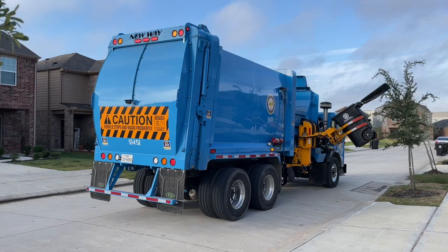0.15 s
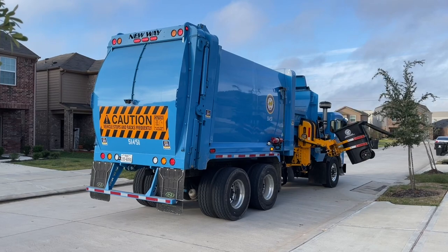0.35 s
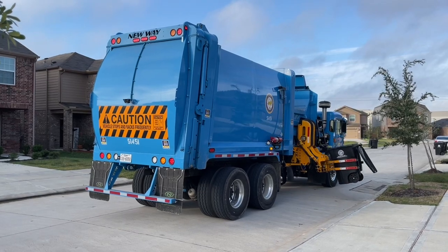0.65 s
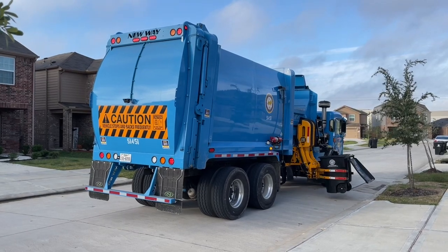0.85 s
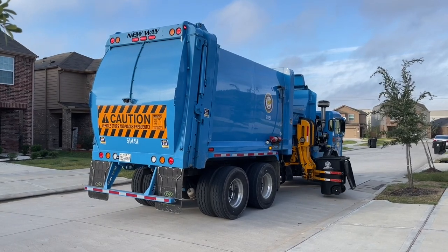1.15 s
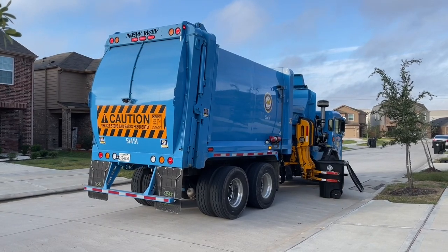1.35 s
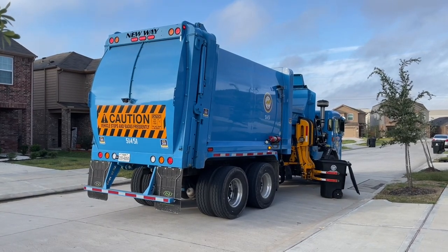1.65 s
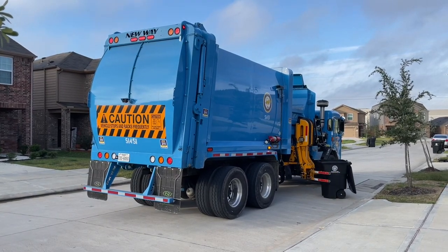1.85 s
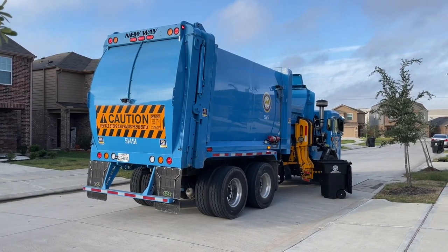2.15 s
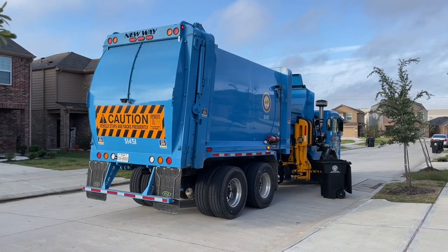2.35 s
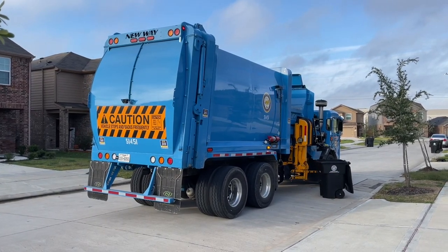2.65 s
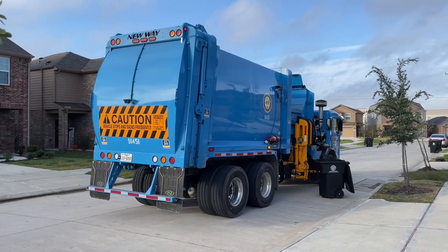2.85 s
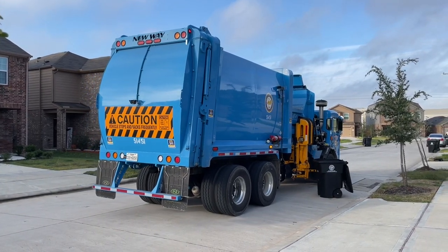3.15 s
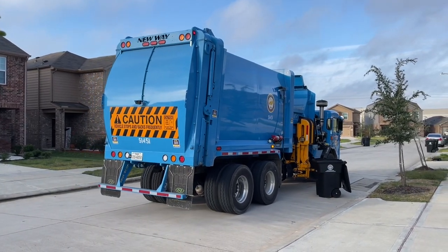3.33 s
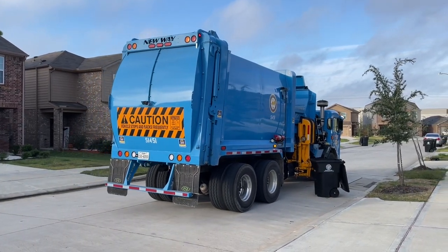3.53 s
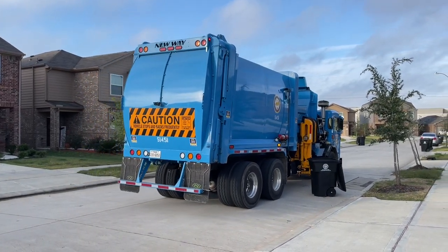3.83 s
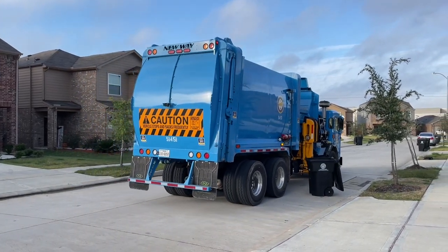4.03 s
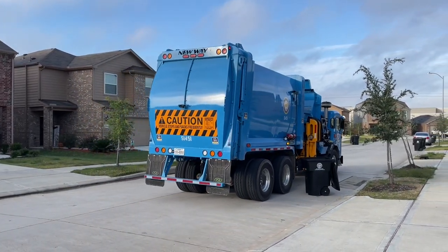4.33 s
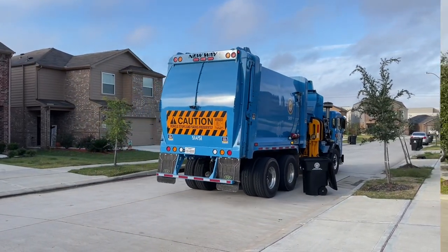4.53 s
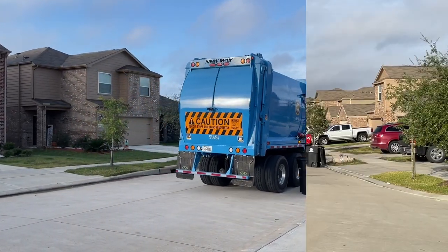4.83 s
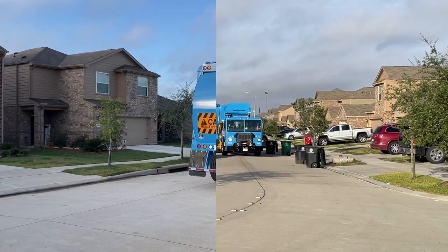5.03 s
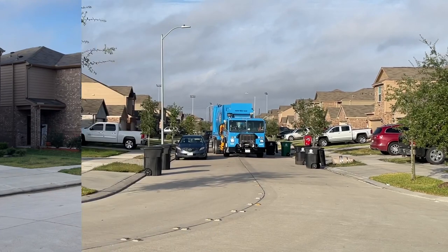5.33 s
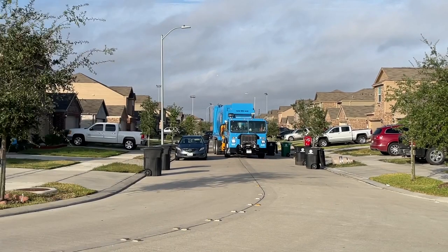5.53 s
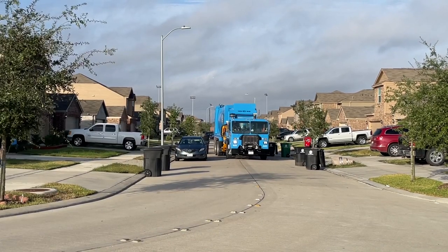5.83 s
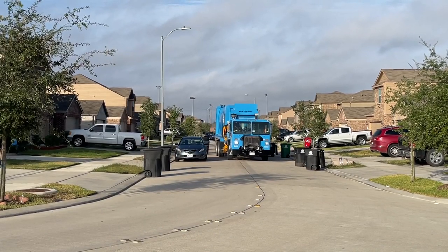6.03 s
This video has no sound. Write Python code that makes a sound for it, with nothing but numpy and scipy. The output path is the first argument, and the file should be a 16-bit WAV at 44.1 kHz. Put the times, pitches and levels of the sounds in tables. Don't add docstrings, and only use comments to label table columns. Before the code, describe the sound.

Heard outdoors fairly near a garbage truck: clattering diesel idle, irregular metallic-dull thuds from the hydraulic arm and faint squeaks, a short quiet gap, then a plastic bin hitting the ground with low hollow booms and lid clatter. A brief pneumatic hiss follows, then the engine climbs in pitch with exhaust drone and thin whines. The ending softens to a farther truck, centred, with muffled bumps.

```python
import sys
import numpy as np
from scipy import signal
from scipy.fft import rfft, irfft, next_fast_len
from scipy.io import wavfile
from scipy.ndimage import uniform_filter1d

SR = 44100
rng = np.random.default_rng(int(sys.argv[2]) if len(sys.argv) > 2 else 0)


def convert_level_to_amplitude(level_db):
    exponent = np.asarray(level_db, float) / 20
    return 10 ** exponent


def unload_audio(sound):
    columns = np.transpose(np.atleast_2d(sound))
    steps = np.round(np.clip(columns, -1, 1) * 32767)
    wavfile.write(sys.argv[1], SR, steps.astype(np.int16))


N = 272427
TIME = np.arange(N) / SR

# (time [s], firing rate [1/s])
ENGINE_SPEED = [(0, 32.9), (2.55, 32.9), (2.8, 39), (3.1, 46), (3.45, 51.5), (3.9, 56.5), (4.04, 60),
                (4.2, 67), (4.36, 71.5), (4.45, 77.5), (4.53, 80.5), (4.64, 85), (4.8, 85.5), (4.96, 87),
                (5.17, 86.5), (5.4, 83), (6.18, 70)]
# (time [s], level [dB])
ENGINE_LOAD = [(2.7, -52), (3.05, -62), (3.45, -62), (3.68, -32.5), (3.85, -26), (4.05, -28), (4.25, -23),
               (4.5, -22.5), (4.66, -21.5), (4.8, -23), (5.17, -29), (5.6, -41.5)]
# (time [s], blow on the walls [dB], boom [dB], boom hold [s])
CART_LANDINGS = [
    (1.353, -16, -10.5, 0.059),
    (1.384, -15.5, -11, 0.032),
    (1.426, -18.5, -7.5, 0.035),
    (1.507, -21.5, -16, 0.055),
    (1.578, -24, -37, 0.019),
    (1.616, -31, -19, 0.057),
    (1.685, -29.5, -19.5, 0.028),
    (1.889, -24.5, -14, 0.016),
    (1.913, -24.5, -15.5, 0.026),
]


def in_time(rows):
    s, *columns = np.transpose(rows)
    return [np.interp(TIME, s, column) for column in columns]


def during(rows):
    return np.clip(np.minimum(TIME - rows[0][0], rows[-1][0] - TIME) / .006, 0, 1)


def at_hz(points, hz):
    points = np.array(points)
    return np.interp(np.log(hz), np.log(points[:, 0]), points[:, 1])


def rms_one(x):
    return x / np.sqrt(np.mean(x ** 2) + 1e-20)


def band(x, low_hz, high_hz, order=2):
    sos = signal.butter(order, [low_hz, min(high_hz, .45 * SR)], "band", fs=SR, output="sos")
    return signal.sosfilt(sos, x)


def drift(rate):
    step = 40
    r = np.exp(-2 * np.pi * step * rate / SR)
    white = rng.standard_normal(N // step + 2002)
    slow = signal.lfilter([1], [1, -2 * r, r * r], white)[2000:]
    return np.interp(np.arange(N) / step, np.arange(len(slow)), rms_one(slow))


def resonances(x, modes):
    out = 0
    for k, (hz, width_hz, db) in enumerate(modes):
        r = np.exp(-np.pi * width_hz / SR)
        poles = [1, -2 * r * np.cos(2 * np.pi * hz / SR), r * r]
        out = out + (-1) ** k * convert_level_to_amplitude(db) * rms_one(signal.lfilter([1, 0, -1], poles, x))
    return rms_one(out)


def tone(hz, width_hz):
    return np.sqrt(2) * np.sin(2 * np.pi * np.cumsum(hz + width_hz * drift(53.0)) / SR)


def placed(x, side_db, low_hz=150):
    high_pass = signal.butter(1, low_hz, "high", fs=SR, output="sos")
    return np.array([x, convert_level_to_amplitude(side_db) * signal.sosfilt(high_pass, x)])


def struck(s, hold, t60):
    rise_s = 0.0032
    late = np.maximum(TIME - s - rise_s - hold, 0)
    return np.clip((TIME - s) / rise_s, 0, 1) * np.exp(-np.log(1000) * late / t60)


def coloured(white):
    # (frequency [Hz], density [dB per Hz])
    truck_colour = [(30, -29), (50, 6), (90, 3), (250, -1.5), (420, -11), (900, -19), (1050, -14.5),
                    (1450, -11), (1600, -13), (2700, -17), (4600, -18.5), (5000, -20.5), (6600, -23),
                    (7600, -36.5)]
    # (frequency [Hz], width [Hz], level [dB])
    panel_modes = [(296, 20, 1), (660, 160, 7), (842, 183, 8.5), (1399, 65, 5), (2108, 390, 6),
                   (2520, 51, 5.5), (3130, 830, 7.5), (3763, 114, 7), (4257, 79, 6.5), (6840, 210, 0)]
    size = next_fast_len(N, real=True)
    hz = np.maximum(np.fft.rfftfreq(size, 1 / SR), 1)
    db = at_hz(truck_colour, hz)
    db = db + sum(peak_db / (1 + (2 * (hz - f) / w) ** 2) for f, w, peak_db in panel_modes)
    return irfft(rfft(white, size) * convert_level_to_amplitude(db), size)[..., :N]


def firing_turns(start_turn):
    return start_turn + np.cumsum(in_time(ENGINE_SPEED)[0]) / SR


def clatter_gate(turns, depth, decay):
    cylinder_db = [0, -13, -1, -11, 0, -14]
    count = turns.astype(int)
    chance_db = rng.normal(0, 0.59, count[-1] + 1)
    strength = convert_level_to_amplitude(np.array(cylinder_db)[count % 6] + chance_db[count])
    gate = 1 + depth * strength * np.exp(-(turns - count) / decay)
    gate = uniform_filter1d(gate, size=40)
    return gate / np.sqrt(uniform_filter1d(gate ** 2, size=8000))


def roar_levels():
    # (time [s], level [dB])
    running = [(0, 0.5), (0.9, 0), (1.05, 0), (1.3, -1), (2.2, 0.6), (2.8, 1.23), (3.4, 2.5), (3.65, 2.5),
               (4.3, 4), (4.58, 4.5), (4.85, 2.5), (5.04, 1.5), (5.15, -0.2), (5.25, -2), (5.37, -5.5),
               (5.68, -3.5), (6.18, -3)]
    idle_db = [-34, -35.5, -39.5, -58.5]
    follows = [0.5, 1.23, 1.12, 1.84]
    swing_end_s, swing_rumble_db, oil_hiss_db = 0.94, -33.5, -58
    drone_db, drone_follows = -28, 0.9
    shudder_db, shudder_t60_s = -4.5, 1
    rumble, body, clatter, top = convert_level_to_amplitude(np.array(idle_db)[:, None] + np.outer(follows, in_time(running)[0]))
    load_db, = in_time(ENGINE_LOAD)
    drone = convert_level_to_amplitude(drone_db + drone_follows * (load_db - load_db.max())) * during(ENGINE_LOAD)
    swing = np.clip((swing_end_s - TIME) / 0.058, 0, 1)
    blows = [convert_level_to_amplitude(db + shudder_db) * struck(s, 0, shudder_t60_s) for s, db, *_ in CART_LANDINGS]
    shudder = np.max(blows, axis=0)
    rumble = np.sqrt(rumble ** 2 + (convert_level_to_amplitude(swing_rumble_db) * swing) ** 2 + shudder ** 2 + drone ** 2)
    return rumble, body, clatter, np.hypot(top, convert_level_to_amplitude(oil_hiss_db) * swing)


def roar(turns):
    # (frequency [Hz], side minus mid [dB])
    width_db = [(60, -12), (200, -12), (380, -10), (700, -9), (1290, -7.5), (2380, -8.5), (4400, -6),
                (8120, 1.5)]
    rumble_gain, body_gain, clatter_gain, top_gain = roar_levels()
    near = np.clip((4.8 - TIME) / 1.6, 0, 1)
    gate = clatter_gate(turns, depth=1.5, decay=.8)
    gate = 1 + near * (gate - 1)
    white = rng.standard_normal((2, 2, N))
    edges = 30 * 2 ** np.arange(0, 8.1, .5)
    together = drift(9)
    shaped, parts = coloured(white), np.zeros((3, 2, N))
    for k, (low, high) in enumerate(zip(edges, edges[1:])):
        hz = np.sqrt(low * high)
        flicker_db = (1.6 if hz < 400 else .8) * (0.73 * together + drift(10.6))
        level = convert_level_to_amplitude(flicker_db) * convert_level_to_amplitude([[0], [at_hz(width_db, hz)]])
        parts[np.searchsorted([330, 1400], hz)] += level * band(shaped[k % 2], low, high)
    rumble, body, clatter = [part / np.std(part[0]) for part in parts]
    top = rms_one(band(white[0], 3500, 11500) + 0.59 * band(white[1], 6430, 9240))
    top = convert_level_to_amplitude(5.5) * top * convert_level_to_amplitude(0.5 * together)
    top[1] += convert_level_to_amplitude(-7) * rms_one(band(white[1, 1], 14000, 15000))
    out = rumble_gain * rumble
    out = out + body_gain * body * gate ** 0.2
    out = out + clatter_gain * clatter * gate ** 0.63
    return out + top_gain * top * convert_level_to_amplitude([[0], [-.6]]) * gate


def whines():
    # (time [s], frequency [Hz], level [dB])
    pump = [(0, 662, -71), (1, 662, -63), (2.5, 668.5, -42.5), (3.3, 660, -54), (3.6, 660, -62)]
    gear = [(4.4, 1120, -60), (4.52, 1175, -43), (4.68, 1220, -43), (5.0, 1248, -44), (5.3, 1268, -47),
            (5.45, 1275, -60)]
    axle = [(4.3, 270, -46), (4.55, 325, -38), (4.64, 340, -41), (4.77, 360, -32), (4.9, 380, -44),
            (5.08, 418, -35), (5.2, 438, -50)]
    turbo = [(3.95, 9500, -66), (4.15, 10500, -61), (4.35, 11700, -61), (4.51, 12700, -59),
             (4.65, 13000, -60), (4.8, 13200, -61), (5.05, 12950, -64), (5.5, 12500, -73)]
    valve = [(2.17, 964, -54), (2.19, 995, -34), (2.25, 995, -40), (2.28, 995, -50), (2.5, 1000, -54)]
    # (line, width in Hz, side in dB)
    lines = ((pump, 4.0, -8), (gear, 2.5, -12), (axle, 5.0, -16), (turbo, 55.0, -4), (valve, 1.5, -1))
    out = np.zeros((2, N))
    for rows, width_hz, side_db in lines:
        hz, db = in_time(rows)
        level = convert_level_to_amplitude(db + 1.5 * drift(15)) * during(rows)
        out += placed(level * tone(hz, width_hz), side_db)
    return out


def exhaust(turns):
    orders_heard = [.5, 1.5, 2, 2.5, 3, 3.5, 4, 4.5, 5]
    # (frequency [Hz], level [dB])
    pipe = [(30, -20), (50, -19), (90, -13), (115, 0), (132, -5), (170, -5), (200, -6), (228, -2),
            (255, -10), (300, -11), (380, -19)]
    firing_opens_hz, cut_db_per_hz = 60, 4.0
    orders_full_db, orders_follow = -30, 0.75
    load_db, rate = in_time(ENGINE_LOAD)[0], in_time(ENGINE_SPEED)[0]
    firing_db = load_db + 2.05 * drift(12) - cut_db_per_hz * np.maximum(firing_opens_hz - rate, 0)
    orders_db = orders_full_db + orders_follow * (load_db - load_db.max())
    orders = 0
    for k in orders_heard:
        extra_db = 5.5 * (k == 1.5)
        level = convert_level_to_amplitude(at_hz(pipe, k * rate) + extra_db + 3 * drift(5))
        orders = orders + level * np.sin(2 * np.pi * (k * turns + .06 * drift(6)))
    both = convert_level_to_amplitude(firing_db) * np.sin(2 * np.pi * turns) + convert_level_to_amplitude(orders_db) * orders
    both = during(ENGINE_LOAD) * np.sqrt(2) * both
    return np.array([both, -convert_level_to_amplitude(-28) * both])


def squeaks():
    # (time [s], level [dB], start [Hz], end [Hz], length [s])
    arm_squeaks = [(0.131, -44, 5030, 5230, 0.033), (0.153, -51, 5440, 7260, 0.072),
                   (0.218, -42, 7400, 9100, 0.038), (0.194, -44, 3700, 3950, 0.044),
                   (0.135, -46, 4500, 4500, .022), (0.184, -55, 10000, 10000, .022),
                   (0.206, -59, 10500, 13200, 0.085), (0.323, -58, 10000, 10000, .025),
                   (0.44, -50.5, 5650, 5660, 0.04), (0.542, -60, 11000, 12600, 0.068),
                   (0.713, -43, 3420, 3680, 0.069), (0.76, -44, 3480, 3550, .055),
                   (2.392, -34, 3700, 3570, 0.0092)]
    # (time [s], level [dB], frequency [Hz], width [Hz], length [s])
    broad_ticks = [(0.56, -42, 4570, 2500, 0.018), (1.121, -32.5, 2800, 1600, 0.0092),
                   (1.14, -38, 8800, 9000, 0.0049), (3.782, -29, 3250, 220, 0.019),
                   (3.783, -37.5, 4500, 700, 0.025), (3.787, -41, 1800, 150, 0.027),
                   (1.205, -52, 4500, 700, 0.012), (1.5, -44.5, 5480, 2000, .02),
                   (1.353, -19.5, 780, 136, .012), (1.353, -28, 1593, 700, .008)]
    rows = []
    for s, db, start_hz, end_hz, length in arm_squeaks:
        width_hz = 0.002 * start_hz + 0.04 * abs(end_hz - start_hz)
        rows.append((s, db, start_hz, end_hz, width_hz, length))
    rows += [(s, db, hz, hz, width_hz, length) for s, db, hz, width_hz, length in broad_ticks]
    out, whites = np.zeros(N), rng.standard_normal((len(rows), SR // 4))
    for (s, db, start_hz, end_hz, width_hz, length), white in zip(rows, whites):
        size = int(length * SR)
        low_pass = signal.butter(2, min(width_hz, .4 * SR), fs=SR, output="sos")
        rough = rms_one(signal.sosfilt(low_pass, white)[-size:])
        glide = np.sin(2 * np.pi * np.cumsum(np.linspace(start_hz, end_hz, size)) / SR)
        out[round(s * SR):][:size] += convert_level_to_amplitude(db) * 2 * rough * glide * signal.windows.tukey(size, .5)
    return placed(out, side_db=2.0, low_hz=6000)


def brake_air():
    # (time [s], jet level [dB], whistle [Hz])
    air = [(2.13, -87, 11210), (2.16, -37, 11200), (2.21, -31.5, 10900), (2.245, -26.5, 10950),
           (2.275, -27, 10550), (2.31, -32, 10300), (2.36, -38.5, 10300), (2.42, -48.5, 10260),
           (2.55, -65, 10500)]
    high_db, hz = in_time(air)
    below_full_db = high_db + 24.5
    low_db = -26.5 + 0.75 * below_full_db
    whistle_db = -18 + 3.1 * below_full_db
    white = rng.standard_normal((2, 2, N))
    low_jet = convert_level_to_amplitude(low_db) * rms_one(band(coloured(white[0]), 5400, 9400, order=1))
    high_jet = convert_level_to_amplitude(high_db) * rms_one(band(white[1], 8500, 12700))
    jet = (low_jet + high_jet) * convert_level_to_amplitude(0.46 * drift(40)) * convert_level_to_amplitude([[0], [1.5]])
    whistle = convert_level_to_amplitude(whistle_db) * (1 + .6 * drift(280)) * tone(hz, 89.0)
    return during(air) * (jet + placed(whistle, side_db=-20))


def knocks(thump_hz, spread):
    # (time [s], strength [dB], hardness [dB], weight [dB])
    arm_knocks = [(0.002, -18, -20.5, 4.5), (0.023, -20.5, -6.5, -18), (0.04, -25, -19, -3),
                  (0.062, -24, -19.5, -2), (0.082, -24, -19, -15), (0.105, -28, -20.5, -5),
                  (0.137, -35.5, -15.5, 15), (0.179, -27.5, -22.5, 9.5), (0.205, -24, -26, -4),
                  (0.219, -15, -10.5, -3), (0.275, -22.5, -8, -20), (0.296, -22, 1, 1),
                  (0.304, -23, -10, -1), (0.374, -19, -34.5, 2.5), (0.385, -25, -16, 3),
                  (0.399, -22, -12.5, -10), (0.413, -18.5, -3, -7), (0.434, -22, 2, -4),
                  (0.456, -21.5, -22.5, 4), (0.521, -15.5, -8, -3), (0.54, -24, -25, -1),
                  (0.568, -24, 1, -10), (0.579, -22.5, 5.5, 0.5), (0.599, -34, -28, -20),
                  (0.624, -19.5, -3, -16), (0.635, -25, -7, -9), (0.656, -23, -6, -18),
                  (0.682, -22.5, -3, -7), (0.697, -35, -17, 0), (0.73, -23, -16, -17),
                  (0.759, -30.5, 6.5, -12), (0.774, -22, -11.5, -21), (0.794, -17.5, -7.5, 0),
                  (0.804, -21.5, -7.5, 2), (0.821, -32, -7, 2), (0.852, -35, -19, -6),
                  (0.89, -23, -15.5, -2), (0.902, -32, -4, 2), (2.17, -22, -18, -9), (2.34, -19, -24, -9)]
    far_knocks = [(5.2, -21, -2.5, 1), (5.295, -24.5, -18, 0), (5.348, -24.5, -18, -7),
                  (5.39, -24, -19, -11), (5.598, -25, -15, 1), (5.655, -26, -22.5, 4), (5.68, -29, -9, -5),
                  (5.708, -30.5, 8, -8), (5.719, -24, -29.5, -3), (5.818, -29, -25.5, 1),
                  (5.861, -33, -18.5, 5), (5.937, -36, -23.5, -10), (5.957, -27.5, -23, -16),
                  (6.07, -24, -16, -5.5), (6.122, -34, -12, 6)]
    contact_s, contact_varies = 0.0051, 0.29
    sweep_top_hz, sweep_s, hard_raises = 900, 0.00549, .25
    cracks = [(s, db - 4, -6, -60) for s, db, *_ in CART_LANDINGS]
    rows = arm_knocks + far_knocks + cracks
    out, t = np.zeros((2, N + SR)), np.arange(SR // 14) / SR
    whites = rng.standard_normal((len(rows), 2, len(t)))
    for (s, strength_db, hard_db, weight_db), white in zip(rows, whites):
        length = contact_s * np.exp(contact_varies * white[1, 0])
        hz = thump_hz + sweep_top_hz * convert_level_to_amplitude(hard_raises * hard_db) * np.exp(-t / sweep_s)
        shape = t / length * np.exp(.5 - .5 * (t / length) ** 2)
        turn = 2 * np.pi * (np.cumsum(hz) / SR + white[1, 1])
        ragged = convert_level_to_amplitude(3 * band(white[0], 60, 400) * 8)
        wave = shape * (np.sin(turn) + .45 * np.cos(2 * turn)) * ragged
        sweep = np.array([wave, convert_level_to_amplitude(-10.5) * np.roll(wave, 20)]) * np.hypot(1, convert_level_to_amplitude(min(hard_db, 10)))
        grit = band(white * shape, 310, 1120)
        grit = convert_level_to_amplitude(hard_db - 5) * grit / np.abs(grit[0]).max() * convert_level_to_amplitude([[0], [-6]])
        late = np.maximum(t - length, 0) / spread
        thump = np.sin(2 * np.pi * thump_hz * (1 + 0.17 * white[0, 0]) * t)
        thump = late * np.exp(1 - late) * thump
        knock = sweep + convert_level_to_amplitude(weight_db) * thump * convert_level_to_amplitude([[0], [-16]]) + grit
        out[:, round(s * SR):][:, :len(t)] += convert_level_to_amplitude(strength_db) * knock
    return signal.sosfilt(signal.butter(3, 980, fs=SR, output="sos"), out[:, :N])


def cart():
    # (time [s], boom [Hz])
    boom_pitch = [(1.35, 124), (1.39, 109), (1.425, 101.3), (1.46, 85.8), (1.51, 104.6), (1.6, 95.3),
                  (1.72, 93.1), (1.89, 103.1), (1.95, 99)]
    # (frequency [Hz], width [Hz], level [dB])
    wall_modes = [(178.7, 23, -2), (141, 17, -2), (236.7, 18, -2), (273, 17, -0.5), (322.4, 13, 2),
                  (398, 76, -5.5)]
    rattle_modes = [(483, 40, -1), (608, 60, 11.5), (705, 27, 13), (810, 54, 13.5), (1120, 88, 11),
                    (1303, 60, 6.5), (1424, 82, 7), (1660, 90, 1.5), (1830, 110, -4), (2140, 190, -0.5)]
    # (time [s], level [dB], brightness [dB])
    lid_clanks = [(1.354, -21.5, 1), (1.372, -21, -0.5), (1.385, -23.5, 3.5), (1.4, -22, -4),
                  (1.418, -27.5, -2), (1.447, -24, 4.5), (1.468, -28.5, 2), (1.489, -32.5, -5),
                  (1.507, -30, -6), (1.525, -30, -3), (1.54, -29, -3), (1.579, -32, 1), (1.665, -38, 0),
                  (1.696, -33.5, 1), (1.727, -37, -5), (1.89, -29.5, 1), (1.92, -30.5, -2),
                  (1.945, -37, -2), (1.97, -40, -1)]
    boom_t60_s, wall_t60_s, clank_t60_s = 0.025, 0.52, 0.16
    contacts = rng.standard_normal((2, N)) * (rng.random((2, N)) < 1200 / SR) + 1e-18
    hz, = in_time(boom_pitch)
    boom = np.array([tone(hz, 5.0), convert_level_to_amplitude(-19) * tone(hz, 15.0)]) * convert_level_to_amplitude(1.5 * drift(30))
    booms = [convert_level_to_amplitude(db) * struck(s, hold, boom_t60_s) for s, _, db, hold in CART_LANDINGS]
    blows = [convert_level_to_amplitude(db) * struck(s, hold, wall_t60_s) for s, db, _, hold in CART_LANDINGS]
    walls = resonances(contacts, wall_modes) * convert_level_to_amplitude([[0], [-16]])
    out = np.max(booms, axis=0) * boom + np.max(blows, axis=0) * walls
    for way in (1, -1):
        tilted = [(f, w, db + way * 6 * np.log2(f / 800)) for f, w, db in rattle_modes]
        rattle = resonances(contacts[::way], tilted)
        clanks = [convert_level_to_amplitude(db - 1 + way * tilt_db) * struck(s, 0, clank_t60_s) for s, db, tilt_db in lid_clanks]
        out += np.max(clanks, axis=0) * rattle * convert_level_to_amplitude([[0], [-9]])
    return out


def scene():
    turns = firing_turns(start_turn=0.282)
    bumps = knocks(thump_hz=95, spread=.007)
    mid, side = roar(turns) + exhaust(turns) + whines() + bumps + cart() + brake_air() + squeaks()
    return np.array([mid + side, mid - side])


def band_limit(x):
    return signal.sosfilt(signal.butter(12, 15800, fs=SR, output="sos"), x)


def record(dry):
    # (start [s], end [s])
    fade_s = (5.3, 5.55)
    dry = signal.sosfilt(signal.butter(2, 46, "high", fs=SR, output="sos"), dry)
    mid, side = (dry[0] + dry[1]) / 2, (dry[0] - dry[1]) / 2
    aside = np.interp(TIME, fade_s, [1, 0])
    side = side + .27 * aside * band(mid, 700, 6500) + .7 * band(mid, 12300, 16000)
    ahead = signal.sosfilt(signal.butter(3, [2100, 6600], "bandstop", fs=SR, output="sos"), side)
    side = aside * side + (1 - aside) * ahead
    mid = signal.sosfilt(signal.butter(3, [7500, 9100], "bandstop", fs=SR, output="sos"), mid)
    mid = signal.sosfilt(signal.ellip(4, 1, 12, 13800, fs=SR, output="sos"), mid)
    side = signal.sosfilt(signal.butter(3, [9900, 12800], "bandstop", fs=SR, output="sos"), side)
    both = np.tanh(np.array([mid + side, mid - side]) / 0.93)
    return band_limit(both)


dry = scene()
out = record(dry)
unload_audio(out)
```